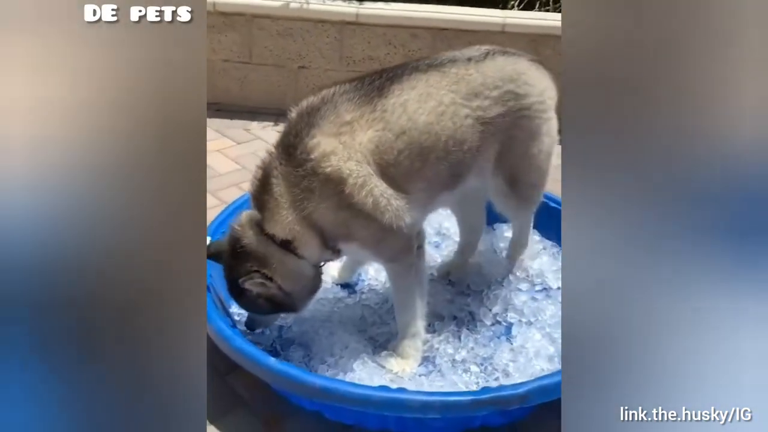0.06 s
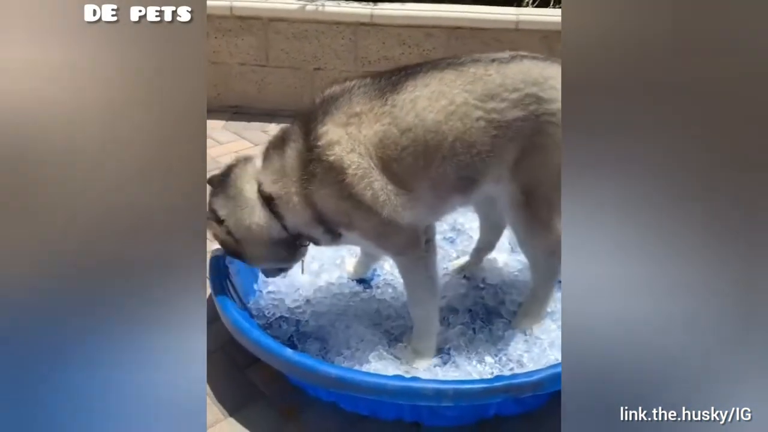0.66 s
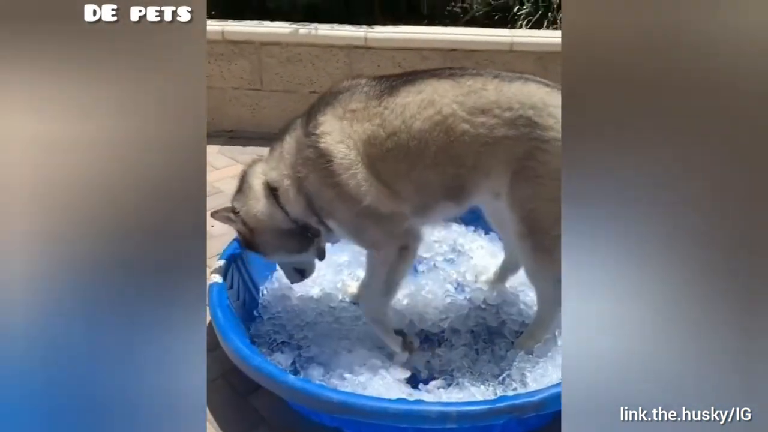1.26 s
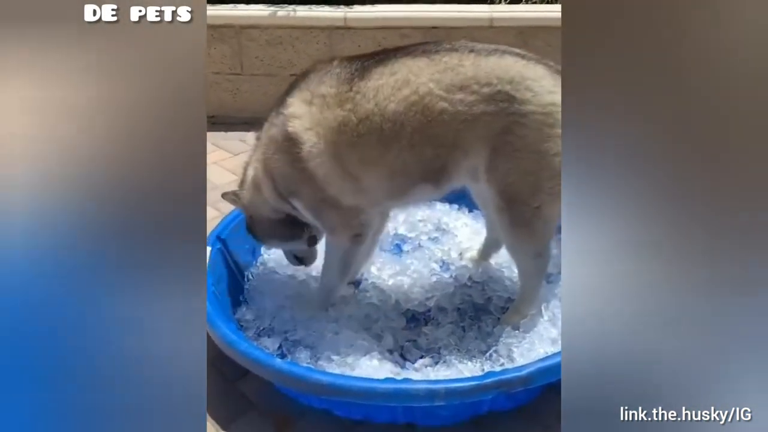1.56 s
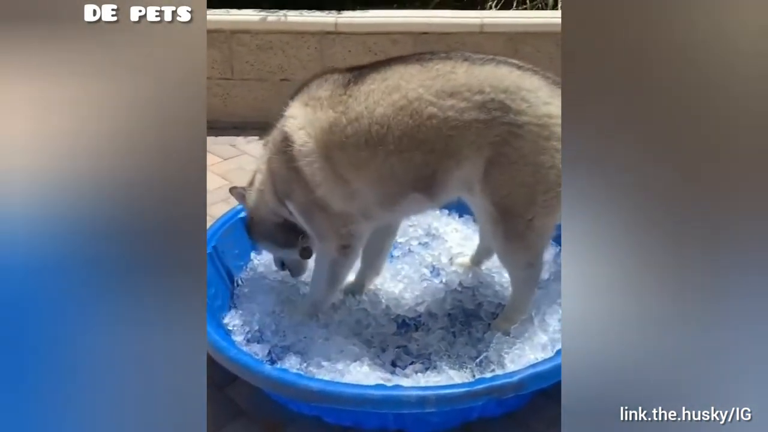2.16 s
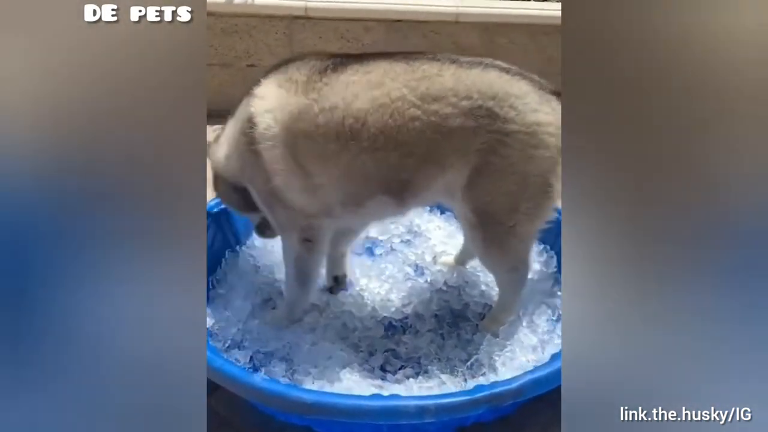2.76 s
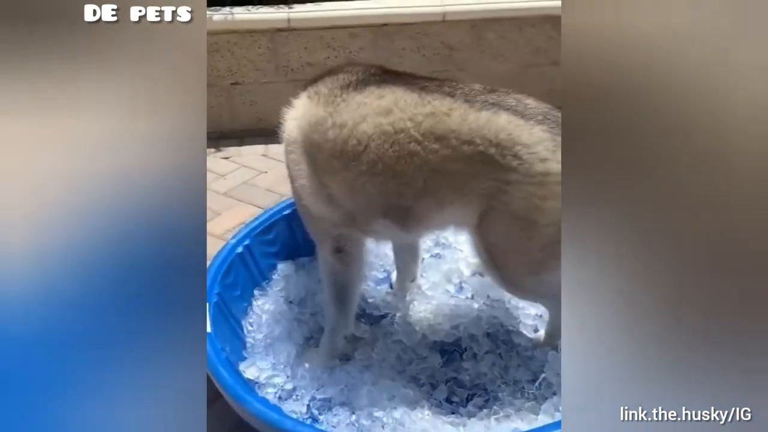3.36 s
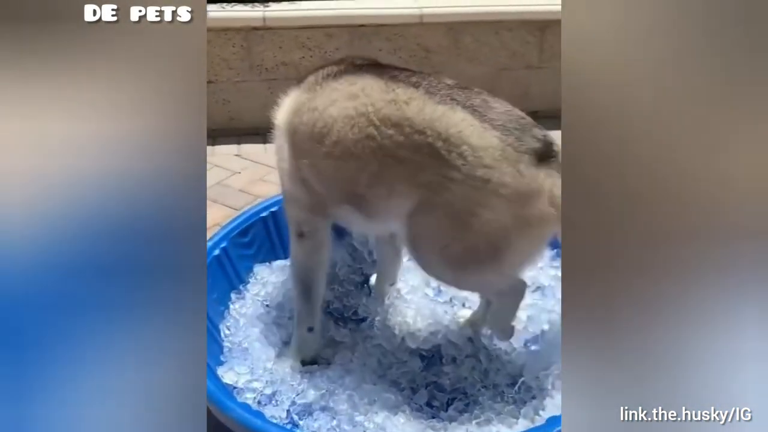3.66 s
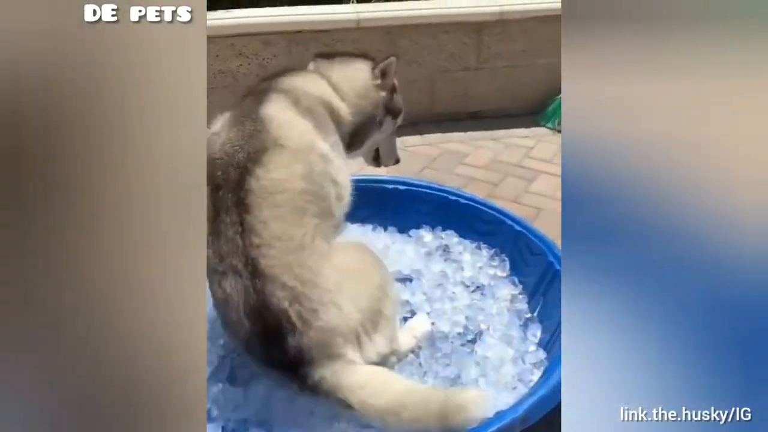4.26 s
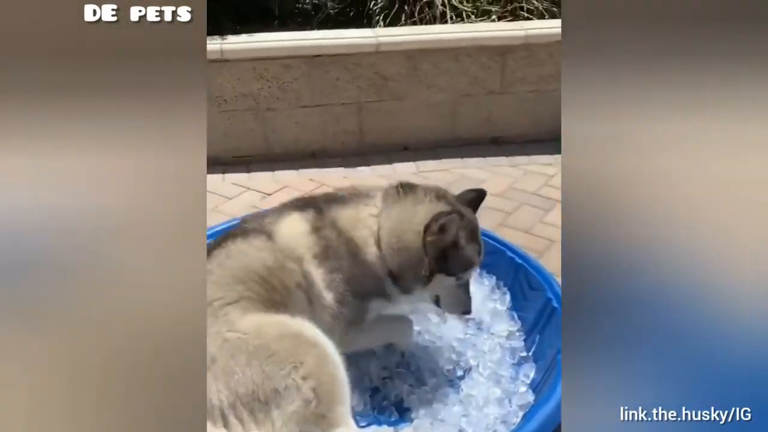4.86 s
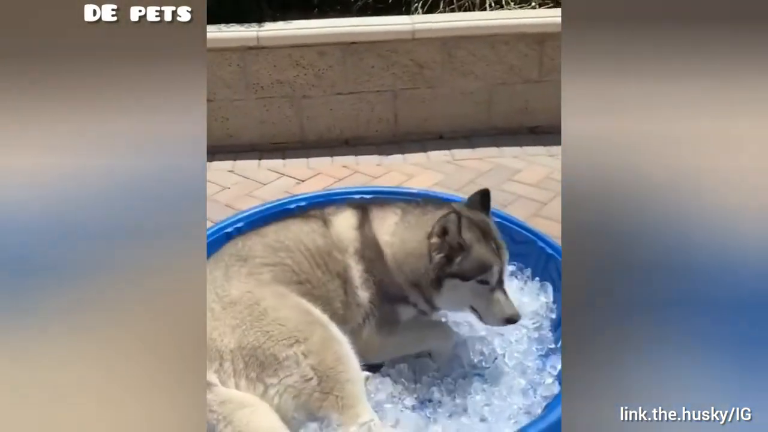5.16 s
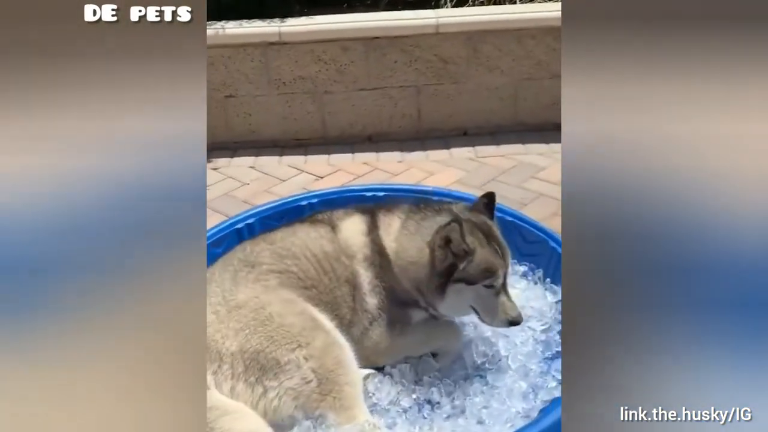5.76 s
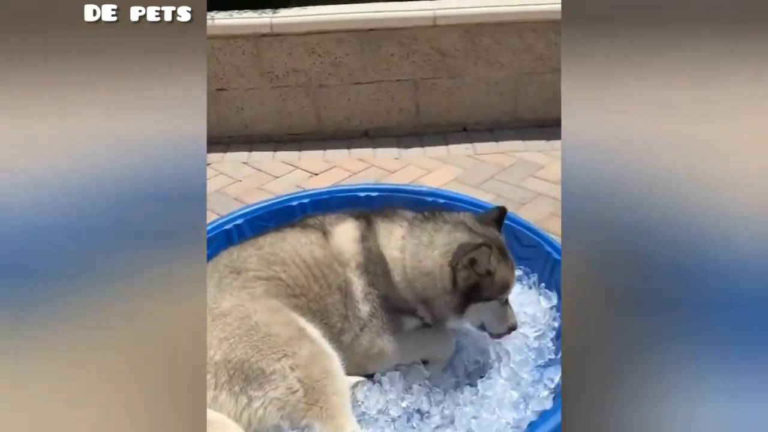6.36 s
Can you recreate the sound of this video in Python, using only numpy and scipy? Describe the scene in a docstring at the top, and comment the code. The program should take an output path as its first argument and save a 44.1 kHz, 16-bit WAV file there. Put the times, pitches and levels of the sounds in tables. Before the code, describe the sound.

A dog digs through ice in a plastic pool, with uneven crunching and hollow thumps that peak as it lies down.

```python
"""Ice cubes crunch in a plastic paddling pool as a dog paws, steps and lies down in them, close by in a yard.
Each push releases an avalanche of stick-slip contacts, denser the harder it is. Single cubes clink,
clack and knock on the plastic, and near the end the dog nips at one. The pool's floor and wall ring
in their normal modes. Paving and a garden wall reflect a little of the sound into faint open air,
and a low rumble, like wind or handling, swells now and then."""
import sys
import numpy as np
from scipy import signal
from scipy.fft import rfft, irfft, next_fast_len
from scipy.io import wavfile
from scipy.ndimage import uniform_filter1d

SR = 44100
rng = np.random.default_rng(int(sys.argv[2]) if len(sys.argv) > 2 else 0)


def to_wav(s):
    """Save 16-bit WAV."""
    ch = np.atleast_2d(s).T  # columns
    pcm = np.round(np.clip(ch, -1, 1) * 32767)  # PCM
    wavfile.write(sys.argv[1], SR, pcm.astype(np.int16))


N = 287091
TIME = np.arange(N) / SR

# the dog's pushes as it noses about, digs, steps round, lies down and shifts at rest:
# (time of full force [s], rise [s], hold [s], t60 [s], crunch [dB], brightness [dB], floor boom [dB])
PUSHES = [ (-0.003, 0.079, 0.32, .3, -49, -11.5, -52), (0.085, .01, .2, .5, -50, -4, -41.5),
          (0.189, 0.03, 0.012, 0.18, -32, -12, -50), (0.22, .04, 0.19, 0.25, -41, -13.5, -42),
          (0.474, 0.038, 0.13, 0.16, -30, -10, -38.5), (0.808, 0.041, 0.0056, 0.28, -32, -10.5, -39),
          (0.906, 0.038, 0.023, 0.13, -44, -4, -40.5), (1.016, 0.088, 0.012, 0.32, -44.5, -8, -44.5),
          (1.197, 0.072, 0.034, 0.88, -28.5, -7, -34.5), (1.491, 0.066, 0.078, 0.37, -24.5, -6.5, -37),
          (1.628, 0.097, 0.016, 0.45, -29.5, -8, -28), (1.885, 0.1, 0.016, 0.27, -32, -6.5, -43.5),
          (1.974, 0.12, 0.047, 0.38, -27.5, -9, -37.5), (2.216, 0.025, 0.17, 0.27, -54, -33, -55),
          (2.42, 0.19, 0.14, 0.66, -34.5, -7, -36), (2.544, 0.066, 0.027, 0.24, -22.5, -4, -39.5),
          (2.608, 0.016, 0.017, 0.23, -28, -8, -27), (2.86, 0.1, 0.062, 0.61, -48, -5.5, -44.5),
          (3.02, .04, 0.02, 0.08, -40.5, -3, -40.5), (3.05, 0.0096, 0.047, 0.14, -28, -5, -35),
          (3.093, 0.034, 0.038, 0.26, -25, -6.5, -32.5), (3.177, 0.05, 0.016, 0.19, -24.5, -5, -32),
          (3.288, 0.22, 0.054, 0.96, -40.5, -9.5, -43.5), (3.504, 0.036, 0.0085, 0.18, -38.5, -4, -47),
          (3.607, 0.047, 0.049, 0.29, -27, -7, -41.5), (3.682, 0.029, 0.015, 0.39, -23.5, -7.5, -53),
          (3.829, 0.033, 0.01, 0.11, -32.5, -6, -39.5), (3.907, 0.063, 0.15, 0.46, -35.5, -11, -43),
          (4.074, 0.087, 0.11, 0.28, -22.5, -5.5, -36.5), (4.257, 0.12, 0.26, 0.38, -29.5, -12.5, -35.5),
          (4.409, 0.076, 0.011, 0.3, -19, -7, -20.5), (4.497, 0.042, 0.014, 0.22, -17, -5.5, -19.5),
          (4.568, 0.059, 0.053, 0.28, -23.5, -11, -23.5), (4.651, 0.033, 0.042, 0.72, -19, -10, -27.5),
          (4.749, 0.04, 0.04, 0.57, -21.5, -8.5, -28.5), (4.841, 0.032, 0.066, 0.26, -19.5, -8.5, -25.5),
          (4.939, 0.16, 0.056, 0.17, -15.5, -9.5, -23), (5.039, 0.11, 0.011, 0.74, -17, -12, -20.5),
          (5.471, 0.072, 0.015, 0.038, -44, -4, -38.5), (5.631, 0.017, 0.006, 0.1, -50, -13, -42),
          (5.706, 0.0039, 0.0069, 0.12, -47, -36, -69), (5.846, 0.055, 0.037, 0.21, -67.5, 0, -77),
          (6.053, 0.02, 0.019, 0.16, -55, -16, -64), (6.165, 0.015, 0.013, 0.26, -42.5, -7, -46),
          (6.316, 0.092, 0.068, 0.4, -55, -4, -55.5)]
# spectrum of the ice bed: (frequency [Hz], gain [dB])
ICE_SPECTRUM = [(100, -19.5), (250, 0), (420, 5.5), (660, 2.5), (900, 2.5), (1250, -1.5), (2000, -0.5),
                (2600, -7.5), (3600, -15.5), (4600, -19.5), (5400, -22.5), (7600, -23.5), (8700, -19.5),
                (10300, -26.5), (11400, -24.5), (12300, -40.5)]
# crossover from the body of the ice sound to its treble: (frequency [Hz], treble share [ratio])
TREBLE_SHARE = [(2300, 0), (4300, 1.0)]
# normal modes of the loaded pool floor: (frequency [Hz], t60 [s], level [dB])
FLOOR_MODES = [(130, 0.11, -17.5), (139.3, 0.12, -7), (176.1, 0.24, -9), (198.5, 0.14, -2.5),
               (212.4, 0.18, -5), (289.6, 0.056, 6.5), (377, 0.018, -18.5)]
# swells of the low rumble: (time of full level [s], rise [s], hold [s], t60 [s], level [dB])
RUMBLE_SWELLS = [(3.17, 0.14, 0.029, 0.29, -36), (4.0, .07, 0.22, .6, -43.5),
                 (4.48, 0.14, 0.039, .3, -34.5), (4.96, .08, 0.056, .6, -37)]
# spectrum of the open air: (frequency [Hz], relative level [dB])
AIR_SPECTRUM = [(20, -4), (55, -8), (110, -6), (200, -9.5), (400, -27), (1000, -30), (1750, -35.5),
                (2000, -21), (2300, -36.5), (4500, -42), (11500, -40)]
# single cubes collide: (time [s], level [dB], note [Hz], brightness [dB], note level [dB])
CLACKS = [(0.052, -51, 960, -7, 5), (0.09, -24.5, 960, -3, -6), (0.19, -17, 680, -0.5, 5),
          (0.318, -19.5, 716, -13.5, -2.5), (0.387, -29, 850, -17, -10), (0.412, -30, 910, -16, -11),
          (0.431, -28, 750, -7, -6), (0.471, -20.5, 990, 12, -7), (0.527, -13, 820, -16.5, -15),
          (0.571, -28.5, 1390, 0, -4), (0.795, -32, 1260, -14, 20), (0.813, -18.5, 940, 1, 5),
          (0.908, -25.5, 1420, -16, -1), (1.144, -29.5, 920, -13, 7), (1.157, -28, 990, -12, -1),
          (1.305, -19.5, 521, -5, 6), (1.471, -16.5, 961, 4, -9), (1.492, -15.5, 920, -10, -9),
          (1.544, -13, 1320, -18, -2), (1.649, -11, 1624, -8, 4), (1.787, -31.5, 735, 2, -13),
          (1.88, -24.5, 858, -17, 8), (2.021, -8, 800, -0.5, 3), (2.238, -39, 890, -27, 11),
          (2.389, -18, 1570, -9, 0), (2.534, -10.5, 1534, 0, 7), (2.566, -10.5, 1567, -3, 20),
          (2.697, -28.5, 918, -10, 3), (2.776, -46, 1300, -18, 7), (2.841, -31.5, 475, -7, 0),
          (2.882, -39, 586, -13, 5), (3.047, -18.5, 640, -7, -5), (3.064, -22, 590, -10, 4),
          (3.089, -14.5, 599, -7, 14), (3.115, -17, 610, -6, 1), (3.169, -17.5, 599, -18, 11),
          (3.18, -8, 1980, -3, 3), (3.194, -19.5, 1450, -10, 12), (3.414, -30.5, 673, -9, 2.5),
          (3.486, -28, 826, -1, 5), (3.52, -21, 1730, -15, 1), (3.604, -20, 1030, -11.5, -4),
          (3.686, -9, 748, -7, 0), (3.88, -27, 1500, 6, -8), (3.888, -24, 620, -18, -15),
          (3.996, -29.5, 1040, -4, -10), (4.095, -10.5, 1460, -14.5, 3), (4.162, -6.5, 850, -5.5, -21),
          (4.657, -8, 1233, -11.5, 12.5), (4.751, -9.5, 1426, -22, -1.5), (4.954, -8, 1285, -3.5, 4),
          (5.181, -14.5, 675, -32, 0), (5.386, -27, 1910, 7, -14), (5.472, -22, 1900, -18, -12),
          (5.48, -24.5, 1130, -12, -10), (5.544, -32.5, 2400, -12, 0), (5.604, -37.5, 1520, -7, 3),
          (5.639, -45, 1256, -19, 11), (5.7005, -37, 1504, -23, 2), (6.063, -38, 830, -13, 5),
          (6.436, -37, 522, -15, 2.5)]
# paws and body land on the floor: (time [s], level [dB], frequency the spot favours [Hz])
LANDINGS = [(0.089, -25, 206), (0.15, -31, 145), (0.227, -28, 204), (0.814, -28, 198), (0.913, -29.5, 217),
            (1.225, -22.5, 297), (2.44, -17, 214), (2.463, -25, 130), (2.569, -22, 184), (2.912, -29, 196),
            (3.06, -26, 304), (3.888, -25.5, 304), (4.099, -25, 123), (4.166, -26, 122), (4.415, -16, 291),
            (4.43, -16.5, 122), (4.509, -25, 293), (4.618, -10, 196.3), (4.67, -14.5, 197.6),
            (4.919, -9, 199), (4.975, -11, 311), (5.138, -18.5, 216), (6.439, -37, 193)]
# a cube is stamped against the plastic: (time [s], level [dB], centre frequency [Hz])
KNOCKS = [(1.177, -31, 1060), (1.3735, -16, 1150), (1.473, -20.5, 900), (1.489, -11.5, 950),
          (1.536, -20, 950), (1.581, -10.5, 1400), (1.631, -18, 950), (1.693, -23.5, 850),
          (1.974, -20, 950), (2.019, -16, 900), (2.195, -30.5, 850), (2.318, -28.5, 850),
          (2.614, -20, 1500), (3.379, -29, 850), (3.766, -28, 2400), (3.7732, -12.5, 850),
          (3.806, -26, 950), (3.8277, -19.5, 900), (4.319, -20.5, 1160), (4.363, -16.5, 800),
          (4.407, -19, 800), (4.495, -11.5, 700), (4.521, -7, 850), (4.837, -12, 1150), (4.926, -9, 900),
          (4.986, -15, 700), (5.009, -9.5, 1000), (5.024, -12.5, 900)]
# normal modes of the pool wall: (frequency [Hz], t60 [s], level [dB])
WALL_MODES = [(297, 0.16, -6), (463, 0.03, -4.5), (583, 0.031, 4.5), (685, 0.025, -4)]
# a paw or the flank shoves cubes along the wall:
# (time of full force [s], rise [s], hold [s], t60 [s], level [dB], pitch of the wall there [ratio])
SHOVES = [(2.462, 0.11, 0.007, 0.2, -30, 0.78), (3.063, 0.038, 0.14, 0.53, -30, 1.11),
          (3.519, 0.065, 0.018, 0.24, -32, 1.1), (3.662, 0.21, 0.27, 0.47, -43, 1.24),
          (4.496, .02, 0.035, .2, -26.5, 1.15), (4.987, .03, .015, .15, -26, 1.1)]
# the dog nips at a cube: (time [s], level [dB], note [Hz], brightness [dB], note level [dB])
NIPS = [(6.0238, -29.5, 1590, 8.5, 9.5), (6.1385, -31.5, 2600, -15, -10), (6.1655, -23, 1290, -2, 6),
        (6.187, -21, 776, -2, 4)]
# likeness of left and right: (frequency [Hz], correlation [-1..1])
STEREO_CORRELATION = [(100, 1), (300, 0.97), (550, 0.94), (1200, 0.75), (1900, 0.17), (4000, 0.19),
                      (5000, -0.45), (6300, 0.82), (7100, -0.79), (7600, -0.92), (8300, 0.3), (9700, 0.96),
                      (10700, -1)]
# balance of the two channels: (frequency [Hz], left minus right [dB])
STEREO_BALANCE = [(350, 0), (1150, 1), (2000, 2.5), (3700, 0.5), (6000, 0), (8800, -2), (10500, 1)]

BUILD_UP_DB = 27  # growth of a swell during its rise; in a push, the first cubes start to give
SETTLE_DB, SETTLE_T60_S, SETTLE_MAX_DB = -22.5, 0.69, -48  # a few cubes slip on after each push
CONTACT_GROWTH = .28  # contact rate goes as crunch amplitude to this power
TRAVEL_CYCLES = 3.8  # scale of a bending wave's delay across the plastic


def undb(db):
    """Amplitude ratio of a level in decibels."""
    return 10 ** (np.asarray(db) / 20)


def curve_at(points, hz):
    """Interpolation of (frequency, value) points on a logarithmic frequency axis."""
    f, value = np.transpose(points)
    return np.interp(np.log(hz + 1), np.log(f), value)


def shape(x, gain):
    """Zero-phase filtering: the spectrum is multiplied by gain(frequency)."""
    size = next_fast_len(x.shape[-1] + 2048)
    spectrum = rfft(x, size) * gain(np.fft.rfftfreq(size, 1 / SR))
    return irfft(spectrum, size)[..., :x.shape[-1]]


def band(x, lo_hz, hi_hz):
    """Band-pass filtering with gentle slopes."""
    sos = signal.butter(2, [lo_hz, min(hi_hz, .45 * SR)], "band", fs=SR, output="sos")
    return signal.sosfilt(sos, x)


def unit(x):
    """Normalisation of each response to unit energy."""
    return x / np.sqrt(np.sum(x ** 2, axis=-1, keepdims=True))


def running_rms(x, seconds):
    """Root-mean-square amplitude in a sliding window."""
    size = int(seconds * SR / 2) + 1
    return np.sqrt(np.abs(uniform_filter1d(uniform_filter1d(x ** 2, size), size)) + 1e-18)


def fade(t, t60):
    """Exponential damping, 60 dB down after t60."""
    return np.exp(-np.log(1000) * t / t60)


def mode(t, hz, t60):
    """Free vibration of a damped oscillator."""
    return np.sin(2 * np.pi * hz * t) * fade(t, t60)


def add(out, s, sound):
    """Superposition of a sound, starting at time s."""
    i = int(np.clip(s * SR, 0, N - 1))
    out[..., i:i + sound.shape[-1]] += sound[..., :N - i]


def placed(sound, side):
    """Direction as amplitude ratio: row 0 is the mid signal, row 1 the side signal."""
    return sound * np.array([[1], [side]])


def swell(s, rise_s, hold_s, t60):
    """An envelope grows exponentially until time s, holds, then decays."""
    t = TIME - s
    return undb(BUILD_UP_DB * np.minimum(t, 0) / rise_s) * fade(np.maximum(t - hold_s, 0), t60)


def push_levels():
    """Incoherent sources add in power: crunch level, brightness and floor boom of all pushes, in dB."""
    power = np.full((3, N), 1e-12)
    for s, rise_s, hold_s, t60, db, bright_db, boom_db in PUSHES:
        settling = undb(min(SETTLE_DB, SETTLE_MAX_DB - db)) * swell(s, rise_s, hold_s, SETTLE_T60_S)
        force = np.maximum(swell(s, rise_s, hold_s, t60), settling)
        power += np.outer(undb([db, db + bright_db, boom_db]), force) ** 2
    level, treble, boom = 10 * np.log10(power)
    return level, treble - level, boom


def cube_contacts(count, crack_t60, cycles, ring_db, rattle_t60, rattle_db, mode_count=4):
    """Impulse responses of unlike cubes, mid and side: a crack, short modes, a rattle through the bed."""
    t = np.arange(SR // 14) / SR
    hz = np.geomspace(600, 11000, 999)[rng.integers(0, 999, (count, mode_count, 1))]
    modes = hz * mode(t, hz, cycles / hz)  # small pieces ring higher and shorter
    ring = rng.standard_normal((count, 2, mode_count)) @ modes
    ring /= np.sqrt(np.mean(np.sum(ring ** 2, axis=-1)))
    crack = unit(rng.standard_normal((count, 2, len(t))) * fade(t, crack_t60))
    rattle = unit(rng.standard_normal((count, 2, len(t))) * fade(t, rattle_t60))
    contact = crack + undb(ring_db) * ring + undb(rattle_db) * rattle
    return contact * np.cos(np.pi / 2 * t / t[-1])  # the neighbours soon stop the cube


def avalanche(level_db, peak_per_s, scatter_db, count=70000):
    """Stick-slip as a random point process: the harder the push, the more cubes slip each second."""
    cubes = cube_contacts(480, crack_t60=.006, cycles=45, ring_db=2.5, rattle_t60=.09, rattle_db=2)
    times, luck, size = rng.uniform(0, N / SR, count), rng.random(count), rng.standard_normal(count)
    # the same few cubes chatter under the paw until it moves on to others
    which = (times * SR / N * len(cubes) + rng.integers(0, 70, count)).astype(int) % len(cubes)
    rate = peak_per_s * undb(CONTACT_GROWTH * (level_db - level_db.max()))
    slips = luck * count * SR / N < np.interp(times, TIME, rate)
    gains = undb(scatter_db * np.minimum(size, 2))
    out = np.zeros((2, N))
    for s, k, gain in zip(times[slips], which[slips], gains[slips]):
        add(out, s, gain * cubes[k])
    return out


def bed_colour(x):
    """The ice bed acts as a filter; its output is split into body and treble."""
    ice = shape(x, lambda f: undb(curve_at(ICE_SPECTRUM, f)))
    treble = shape(ice, lambda f: curve_at(TREBLE_SHARE, f))
    return ice - treble, treble


def crunch(level_db, bright_db):
    """The contacts share the power of the push; cubes on top sound bright, those under the dog dull."""
    body, treble = bed_colour(avalanche(level_db, peak_per_s=3600, scatter_db=1.6))
    body /= running_rms(band(body[0], 350, 2700), 0.087)
    treble /= running_rms(treble[0], 0.8)
    return undb(level_db) * (undb(-2.5) * body + undb(bright_db + 0.22) * treble)


def tumbles(level_db, per_s, cycles, share_db, count=2000):
    """Whole cubes tip over, and each vibrates briefly in one hollow-sounding mode."""
    out, t = np.zeros((2, N)), np.arange(SR // 20) / SR
    for s, luck, pitch, softness, side in rng.random((count, 5)) * [N / SR, 1, 1, 1, 1]:
        if luck * count * SR / N < per_s:
            hz = 760 * 6 ** pitch
            note = unit(mode(t, hz, cycles / hz) * (1 - np.exp(-hz * t)))
            # small, high cubes carry less energy
            db = level_db[int(s * SR)] + share_db - 8 * pitch - 12 * softness
            add(out, s, placed(undb(db) * note, 2 * side - 1))
    return out


def clinks(treble_db, per_s, cycles, share_db, count=2200):
    """Light damping lets loose cubes on top ring like glass in two close modes; each rebounds once."""
    out, t = np.zeros((2, N)), np.arange(SR // 10) / SR
    for s, luck, pitch, softness, split, side, hop in rng.random((count, 7)) * [N / SR, 1, 1, 1, 1, 1, 1]:
        if luck * count * SR / N < per_s:
            hz = 2400 * 3.7 ** pitch
            upper_hz = hz * (1.04 + .2 * split)
            ring = unit(mode(t, hz, cycles / hz) + .5 * mode(t, upper_hz, cycles / upper_hz))
            db = treble_db[int(s * SR)] + share_db - 10 * softness
            note = placed(undb(db) * ring, 2 * side - 1)
            add(out, s, note)
            add(out, s + .008 + .025 * hop, note / 2)
    return out


def bending_wave(hz, travel_cycles, width_octaves=.7):
    """Dispersion: highs cross the plastic first, so a blow arrives as a brief downward chirp."""
    ratio = np.fft.rfftfreq(2048, 1 / SR) / hz + 1e-6
    magnitude = np.exp(-.5 * (np.log2(ratio) / width_octaves) ** 2)
    turns = travel_cycles * (2 * np.sqrt(ratio) - ratio / 3)
    return unit(irfft(magnitude * np.exp(-2j * np.pi * turns)))


def jostles(level_db, peak_per_s, share_db, count=2400):
    """Light impacts near and far launch bending waves in the plastic, more often in a hard push."""
    out = np.zeros((2, N))
    rate = peak_per_s * undb(CONTACT_GROWTH * (level_db - level_db.max()))
    for s, luck, pitch, softness, distance, side in rng.random((count, 6)) * [N / SR, 1, 1, 1, 1, 1]:
        if luck * count * SR / N < rate[int(s * SR)]:
            wave = bending_wave(650 * 4.6 ** pitch, TRAVEL_CYCLES * (.7 + distance + pitch))
            db = level_db[int(s * SR)] + share_db - 5 * pitch - 10 * softness
            add(out, s, placed(undb(db) * wave, 3 * side - 1.5))
    return out


def sheet_ring(modes):
    """The impulse response of a plastic sheet is the sum of its damped normal modes."""
    t = np.arange(SR // 4) / SR
    return sum(undb(db) * mode(t, hz, t60) for hz, t60, db in modes)


def grind(modes, lowest_hz, taps_per_s):
    """Random excitation: many small taps of cubes keep a sheet ringing, held at unit level."""
    taps = rng.standard_normal((2, N)) * (rng.random(N) < taps_per_s / SR)
    ringing = signal.fftconvolve(taps, sheet_ring(modes)[None])[:, :N]
    ringing = band(ringing, lowest_hz, 700)
    return ringing / running_rms(ringing[0], 0.063)


def floor_boom(boom_db):
    """Forced vibration: the floor resonates under the grinding cubes."""
    return undb(boom_db - 3.5) * grind(FLOOR_MODES, lowest_hz=100, taps_per_s=830)


def low_rumble(level_db, rest_db, push_share_db):
    """Low noise, like wind or handling: a steady part, a share of each push and swells add in power."""
    rumble = band(rng.standard_normal((2, N)), 24, 68)
    swell_power = sum((undb(db) * swell(*timing)) ** 2 for *timing, db in RUMBLE_SWELLS)
    envelope = np.sqrt(undb(rest_db) ** 2 + undb(level_db + push_share_db) ** 2 + swell_power)
    return undb(-6) * envelope * rumble / rumble.std()


def open_air(level_db):
    """Ambient noise, strongest in the bass, with a slow random amplitude modulation."""
    air = shape(rng.standard_normal((2, N)), lambda f: undb(curve_at(AIR_SPECTRUM, f)))
    waver_db = np.interp(TIME, np.linspace(0, N / SR, 30), 1.5 * rng.standard_normal(30))
    return air / air.std() * undb(level_db + waver_db)


def clacks(rows, rattle_t60, rattle_db, ring_cycles, note_cycles, glint_db, sweep_cycles):
    """An impact rattles the neighbours and excites the hollow resonance of a cube and its support."""
    out = np.zeros((2, N))
    for s, db, hz, bright_db, note_db in rows:
        contact = cube_contacts(1, crack_t60=0.0033, cycles=ring_cycles, ring_db=4,
                                rattle_t60=rattle_t60, rattle_db=rattle_db, mode_count=12)[0]
        body, treble = bed_colour(contact)
        t = np.arange(body.shape[1]) / SR
        # bending waves carry the highs first, so a swept note drops onto its pitch
        turns = hz * t + sweep_cycles * (1 - np.exp(-hz * t / 2))
        note = unit(np.sin(2 * np.pi * turns) * fade(t, note_cycles / hz) * (1 - np.exp(-hz * t)))
        note = placed(note, rng.uniform(-1, 1))
        hit = unit(body) + undb(bright_db + glint_db) * unit(treble) + undb(note_db) * note
        add(out, s, undb(db) * hit / np.abs(hit[0]).max())
    return out


def snaps(rows, snap_db, lowest_hz):
    """Direct sound: the first crack of a cube on top travels through the air, undulled by the bed."""
    out, t = np.zeros((2, N)), np.arange(SR // 100) / SR
    for s, db, _, bright_db, _ in rows:
        crack = band(rng.standard_normal((2, len(t))) * fade(t, t60=.005), lowest_hz, SR)
        add(out, s, undb(db + snap_db + 2 * min(bright_db, 0)) * crack / np.abs(crack).max())
    return out


def landings(gain_db, rise_s, spot_octaves):
    """Modal coupling: a soft, heavy landing drives the floor modes that move most at that spot."""
    out = np.zeros((2, N))
    for s, db, spot_hz in LANDINGS:
        ring = sheet_ring([(hz, t60, mode_db - 10 * abs(np.log2(hz / spot_hz)) / spot_octaves)
                           for hz, t60, mode_db in FLOOR_MODES])
        t = np.arange(len(ring)) / SR
        thump = ring * (1 - np.exp(-t / rise_s))
        add(out[0], s, undb(db + gain_db) * thump / np.abs(thump).max())
    return out


def knocks(rattle_db):
    """A hard stamp sends a bending wave through the plastic and shakes the cubes around it."""
    out = np.zeros((2, N))
    for s, db, hz in KNOCKS:
        shaken = cube_contacts(1, crack_t60=.012, cycles=18, ring_db=0, rattle_t60=.04, rattle_db=3)[0]
        wave = bending_wave(hz, TRAVEL_CYCLES)
        gain = undb(db) / np.abs(wave).max()
        add(out[0], s, gain * wave)
        add(out, s, gain * undb(rattle_db) * unit(sum(bed_colour(shaken))))
    return out


def wall_shoves():
    """Forced vibration: cubes shoved along the pool wall drive its modes, whose pitch varies by place."""
    out = np.zeros((2, N))
    for *timing, db, pitch in SHOVES:
        modes = [(hz * pitch, t60, mode_db) for hz, t60, mode_db in WALL_MODES]
        out += undb(db) * swell(*timing) * grind(modes, lowest_hz=280, taps_per_s=260)
    return out


def yard(x, t60, wet_db, onset_s):
    """Diffuse reflection from the paving and the garden wall adds a thin, dull tail."""
    t = np.arange(SR // 2) / SR
    echo = band(rng.standard_normal((2, len(t))), 120, 6800) * fade(t, t60) * np.minimum(t / onset_s, 1)
    return x + undb(wet_db) * signal.fftconvolve(x, unit(echo), axes=1)[:, :N]


def stereo_image(x):
    """Correlation: left and right are alike in the bass, wide and partly opposed in the treble."""
    correlation = lambda f: np.clip(curve_at(STEREO_CORRELATION, f), -1, .988)
    mid = shape(x[0], lambda f: np.sqrt((1 + correlation(f)) / 2))
    side = shape(x[1], lambda f: np.sqrt((1 - correlation(f)) / 2))
    return np.array([shape(mid + sign * side, lambda f: undb(sign * curve_at(STEREO_BALANCE, f) / 2))
                     for sign in (1, -1)])


def scene():
    """Superposition of ice, pool, rumble, reflections and open air, with the direct snaps on top."""
    level_db, bright_db, boom_db = push_levels()
    ice = crunch(level_db, bright_db)
    ice += tumbles(level_db, per_s=170, cycles=56, share_db=25.5)
    ice += clinks(level_db + bright_db, per_s=190, cycles=340, share_db=24.5)
    ice += clacks(CLACKS, rattle_t60=.055, rattle_db=13.5, ring_cycles=40, note_cycles=70,
                  glint_db=5.5, sweep_cycles=0.76)
    ice += jostles(level_db, peak_per_s=300, share_db=23.5)
    ice += knocks(rattle_db=-5)
    ice += clacks(NIPS, rattle_t60=.018, rattle_db=0.5, ring_cycles=33, note_cycles=7.4,
                  glint_db=6.5, sweep_cycles=0)
    direct = snaps(CLACKS, snap_db=-10, lowest_hz=7800) + snaps(NIPS, snap_db=-6, lowest_hz=8000)
    pool = floor_boom(boom_db) + wall_shoves() + landings(gain_db=-3.5, rise_s=.006, spot_octaves=.4)
    rumble = low_rumble(level_db, rest_db=-53.5, push_share_db=-32)
    outdoors = yard(ice + pool + rumble, t60=0.22, wet_db=-12.5, onset_s=0.0017)
    return direct + stereo_image(outdoors + open_air(level_db=-54.5))


def record(dry):
    """Soft saturation rounds the loudest peaks, and a steep low-pass cuts the top."""
    rounded = 1.1 * np.tanh(dry / 1.1)
    return signal.sosfilt(signal.ellip(10, .2, 80, 12100, fs=SR, output="sos"), rounded)


dry = scene()
out = record(dry)
to_wav(out)
```